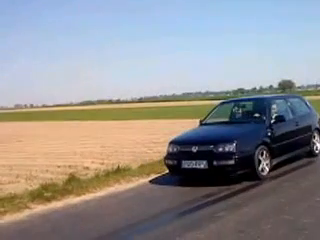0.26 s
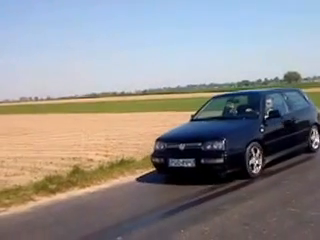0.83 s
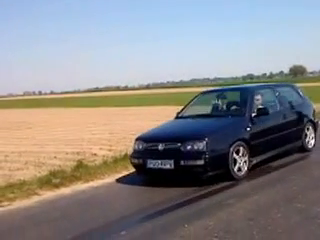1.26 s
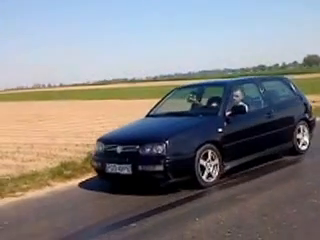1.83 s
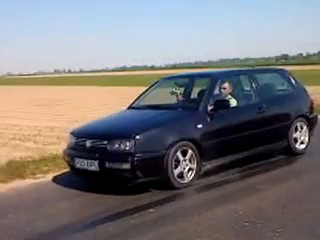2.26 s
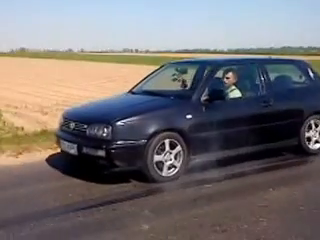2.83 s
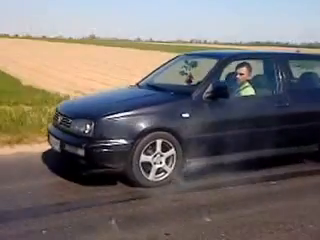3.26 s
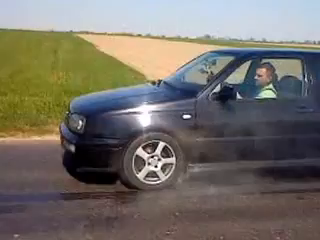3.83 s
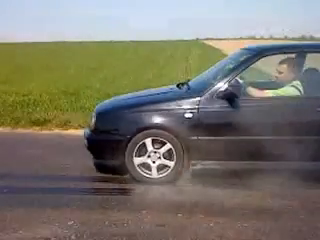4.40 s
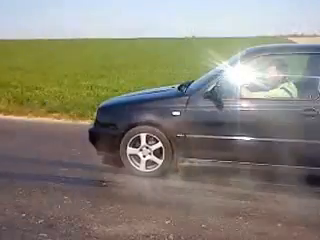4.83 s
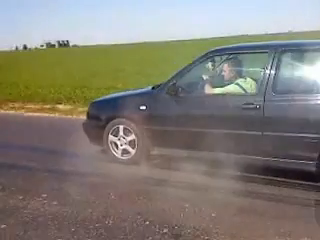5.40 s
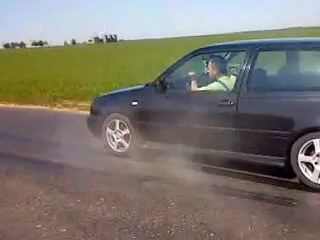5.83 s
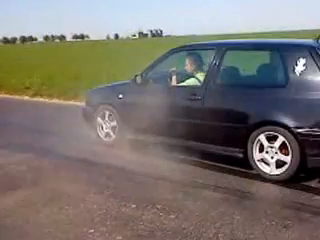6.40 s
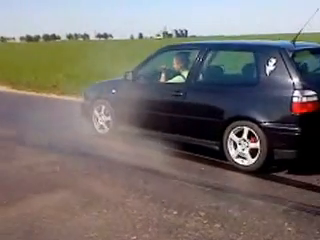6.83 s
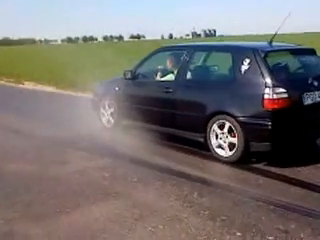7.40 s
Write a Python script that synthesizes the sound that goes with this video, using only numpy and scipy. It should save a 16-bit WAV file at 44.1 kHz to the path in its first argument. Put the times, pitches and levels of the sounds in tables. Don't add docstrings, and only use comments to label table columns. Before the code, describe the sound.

Small car at an open roadside: brief grating squeal, engine revs surge and hold in a steady buzzing roar with tyre scrub and wind buffets.

```python
import sys
import numpy as np
from scipy import signal
from scipy.fft import rfft, irfft, next_fast_len
from scipy.io import wavfile
from scipy.ndimage import uniform_filter1d, map_coordinates

SR = 44100
rng = np.random.default_rng(int(sys.argv[2]) if len(sys.argv) > 2 else 0)


def wav_out(sig):
    wavfile.write(sys.argv[1], SR, np.round(np.clip(np.atleast_2d(sig).T, -1, 1) * 32767).astype(np.int16))


def to_linear_factor(level_db):
    exponent = np.asarray(level_db, float) / 20
    return 10 ** exponent


N = 332955
T = np.arange(N) / SR


def unit(x):
    return x / np.sqrt(np.mean(x ** 2))


def columns(table):
    s, *rest = np.transpose(table)
    return [np.interp(T, s, column) for column in rest]


def colour(x, points):
    hz, db = np.transpose(points)
    size = next_fast_len(N, True)
    f = np.maximum(np.arange(size // 2 + 1) * SR / size, 1)
    gain = to_linear_factor(np.interp(np.log(f), np.log(hz), db))
    return irfft(rfft(x, size) * gain, size)[:N]


def walk(rate, size=N):
    hold = int(SR / rate)
    steps = np.repeat(rng.standard_normal(size // hold + 2), hold)
    slewed = uniform_filter1d(uniform_filter1d(steps, hold), hold)
    return unit(slewed[:size])


def swell(s, half, db):
    return to_linear_factor(db) * np.exp(-((T - s) / half) ** 2)


# time in seconds, firing rate in Hz, level of the firing tone in dB.
ENGINE = [(0, 74.9, -38), (.17, 69.5, -26), (.26, 66.3, -40), (.65, 67, -40), (.9, 71.2, -33),
          (1.1, 81, -35), (1.4, 98.8, -38), (1.5, 106.5, -25), (1.8, 124.5, -19.5), (2.1, 137.6, -18.5),
          (2.4, 147.9, -16), (2.75, 150.8, -15), (3.15, 151.1, -16.5), (3.65, 149.6, -17.5),
          (4.4, 150.3, -15), (5.6, 151.2, -19), (6.5, 151.2, -16), (7.55, 153.3, -16.5)]


def crankshaft():
    firing_hz, firing_db = columns(ENGINE)
    hz = uniform_filter1d(firing_hz, SR // 8) / 4
    return np.cumsum(hz) / SR, hz, firing_db


def tone(cycles, order, wobble):
    size = len(cycles)
    phase = 2 * np.pi * order * cycles + wobble * walk(12, size=size) + rng.uniform(0, 6.96)
    return np.sqrt(2) * to_linear_factor(wobble * 5.9 * walk(8.1, size=size)) * np.sin(phase)


PIPE_ORDERS = (8, 12, 7, 6, 14)
PIPE_UNDER_DB = (-24, -21.5, -15, -27.5, -31.5)
# order in waves per cycle, centre in seconds, half length in seconds, peak in dB.
PIPE_SWELLS = [(8, 0.06, 0.11, -31.5), (8, 1.24, 0.15, -25), (8, 1.824, .17, -21.5), (8, 2.26, 0.2, -27.5),
               (8, 3.8, .5, -31), (8, 5.75, 0.73, -23), (8, 7.5, .6, -35.5), (12, .08, .1, -34),
               (12, 1.09, 0.086, -27.5), (12, 1.36, .1, -24), (12, 2.09, 0.2, -25.5), (12, 3.4, .6, -31.5),
               (12, 4.4, .17, -31), (12, 5.5, 0.85, -27), (12, 7.5, 0.39, -36.5), (7, 1.2, .08, -37),
               (7, 1.5, .15, -42), (7, 2.08, 0.13, -30), (7, 4.4, .5, -31), (7, 6.7, 0.45, -32),
               (7, 5.4, 0.38, -37), (7, 3.4, .4, -34), (6, 4.6, 1.2, -45), (6, 1.42, 0.089, -32),
               (14, 1.285, 0.098, -33), (14, 2.3, 0.42, -43.5)]
# order in waves per cycle, centre in seconds, half length in seconds, peak in dB.
WHINES = [(20, 1.08, 0.14, -32.5), (18, 1.18, 0.053, -27.5), (28, 1.55, 0.27, -31), (23, 2.5, 0.32, -30.5),
          (18, 1.8, 0.21, -42), (11, 1.26, .047, -26), (10, 1.6, 0.065, -30), (9, 1.49, 0.17, -25.5),
          (10, 3.9, .27, -32), (20, 2.81, 0.53, -27.5), (32, 3.12, 0.36, -30), (48, 1.95, 0.18, -32.5),
          (24, 3.2, 0.55, -28.5), (28, 3.7, .8, -25), (56, 3.6, 0.88, -32.5), (44, 3.67, .41, -30.5),
          (18, 4.7, 1.1, -33), (20, 4.8, 1.1, -31), (32, 5.8, .8, -29.5), (24, 5.8, 1.1, -33),
          (43, 5.5, 0.73, -26.5), (46, 6.3, 1.1, -34), (60, 6.6, 0.22, -30.5), (39, 6.9, .43, -34.5),
          (43, 7.2, 1, -34), (20, 7.2, 0.36, -27.5), (28, 7.0, .5, -30.5), (10, 2.9, .45, -30),
          (10, 6.6, 1.3, -34), (5, 3.9, 1.6, -37)]


def exhaust(cycles, firing_db):
    out = to_linear_factor(firing_db) * tone(cycles, order=4, wobble=0.057)
    for pipe_order, under_db in zip(PIPE_ORDERS, PIPE_UNDER_DB):
        size = to_linear_factor(firing_db + under_db)
        size += sum(swell(*row) for order, *row in PIPE_SWELLS if round(order) == pipe_order)
        out += size * tone(cycles, pipe_order, wobble=0.045 * np.sqrt(pipe_order))
    for order, s, half, db in WHINES:
        near = np.abs(T - s) < 2.2 * half
        out[near] += swell(s, half, db)[near] * tone(cycles[near], round(order), wobble=0.24)
    return out


def clatter(cycles, hz, drift):
    size = 768
    orders = rfft(rng.standard_normal((40, size)))
    patterns = irfft(orders / np.abs(orders) ** 0.2, size)
    reshuffle = 9 * np.cumsum(np.abs(np.gradient(np.log(hz))))
    row = np.clip(drift * T + reshuffle, 0, 38.9)
    blend = row % 1
    played = map_coordinates(patterns, [row, cycles % 1 * size], order=1, mode="grid-wrap")
    return unit(played * np.sqrt(hz / ((1 - blend) ** 2 + blend ** 2)))


# centre in seconds, half length in seconds, frequency in Hz, gain in dB.
FACING = [(6.1, .5, 1650, 4), (1.17, .95, 3980, 9), (1.35, .6, 246, 8), (1.1, .9, 2104, -7),
          (1.37, .7, 2500, 4.5), (1.2, 1, 4550, -1.5), (1.702, .76, 6150, -1.5), (2.004, 1, 5280, 6.5),
          (2.36, 0.77, 3160, -4), (2.89, 0.55, 1760, 5.5), (3.05, .65, 3600, -5), (1.8, 0.36, 1700, 4),
          (3.6, 0.55, 1323, 8.5), (3.9, .39, 810, -4), (4.3, 1, 1530, -7.5), (3.9, 0.42, 3030, 2.5),
          (4.4, 0.31, 2400, -7.5), (7.2, .3, 1900, 5), (6.9, 0.41, 3080, 5), (1.74, 0.68, 575, 8),
          (.5, .48, 747, 7), (2.52, 0.76, 1230, 7), (.13, 0.08, 2590, 11.5), (5.3, .79, 6400, -4),
          (6.7, 0.25, 2340, 8.5), (6.8, 0.39, 2010, -5), (6.9, .6, 2850, -5.5), (7.2, 0.76, 1600, 5),
          (7.3, 0.3, 4020, -6), (7.3, 0.87, 5220, 5)]


def facing(x):
    f, s, frames = signal.stft(x, SR, nperseg=2048)
    db = 0
    for centre, half, hz, peak_db in FACING:
        half_width_hz = 18 + 0.051 * hz
        over_hz = np.exp(-((f - hz) / half_width_hz) ** 2)
        over_time = np.exp(-((s - centre) / half) ** 2)
        db = db + peak_db * np.outer(over_hz, over_time)
    return signal.istft(frames * to_linear_factor(db), SR, nperseg=2048)[1][:N]


# time in seconds, roar in dB as heard, brightness of the slipping hiss on it in dB.
ROAR = [(0, -6, -2), (.19, -7, -2.5), (.22, -5.5, 13), (.26, -16, 13.5), (.5, -15, 9.5), (.75, -11.5, 7),
        (.95, -9, 3), (1.05, -4.5, 3), (1.2, -1, 1), (1.6, 2.5, -2.7), (2.5, -0.4, 0), (3.4, -0.5, 1.8),
        (4.3, 1.5, -1.1), (5.0, -1, 0.1), (5.8, 0.4, 1.5), (6.4, -2, 0), (7.0, -1.7, -0.8), (7.55, -1, 0)]
# frequency in Hz, level in dB per Hz.
BODY = [(40, -26.5), (110, -5.5), (200, -4.5), (330, 1.5), (470, -3.5), (590, -9), (720, 1.5), (1080, 1.5),
        (1300, -6), (1430, -5.5), (1620, -5.5), (3100, -6), (3650, -7.5), (6500, -10)]


def roar(cycles, hz):
    roar_db, bright_db = columns(ROAR)
    sump_db = -5.5 - 0.16 * roar_db - 1.03 * bright_db
    knock_db = 0.082 + 0.85 * roar_db + 0.28 * bright_db
    firing = 1 + 0.057 * np.cos(2 * np.pi * 4 * cycles)
    scrub = unit(rng.standard_normal(N) * firing * to_linear_factor(0.51 * walk(15)))
    scrub = colour(scrub, [(40, 6), (110, 0), (300, -5), (800, 0)])
    knocks = colour(clatter(cycles, hz, drift=1.6), [(2600, 0), (5500, -8)])
    share = np.clip(0.22 + 0.02 * T, 0, 1)
    body = colour(np.sqrt(share) * knocks + np.sqrt(1 - share) * scrub, BODY)
    sump = colour(body, [(520, -18.5), (680, -39)])
    block = colour(body, [(520, -32.5), (640, -7.5), (1380, 0.5), (1500, -35.5)])
    knock = colour(body, [(1380, -38.5), (1480, 3.0), (3300, -2), (3800, -24.5)])
    hiss = colour(body, [(3200, -35.5), (3600, 5.0)])
    # region, level in dB, its own sway in dB
    parts = ((sump, sump_db, 0.6), (block, roar_db - 0.78, 0.6),
             (knock, knock_db, 0.7), (hiss, roar_db + bright_db - 4, 0.7))
    held_db = -22
    together = walk(8)
    out = np.zeros(N)
    for x, db, own_db in parts:
        out += unit(x) * to_linear_factor(held_db + db + own_db * walk(7) + 0.4 * together)
    return facing(out)


# frequency in Hz, level in dB per Hz.
WIND_COLOUR = [(6, -47), (18, -21), (35, -8.5), (70, -4), (120, -9), (250, -11), (500, -42)]
# time in seconds, level in dB.
BREEZE = [(0, -41), (1.6, -37), (2.8, -55.5), (4.8, -58.5), (5.9, -48), (6.4, -44), (7.55, -52)]
# centre in seconds, half length in seconds, peak in dB.
GUSTS = [(0.164, 0.054, -27.5), (0.756, .06, -32.5), (.86, .05, -29), (1.198, 0.03, -25.5),
         (1.41, 0.11, -32), (1.85, 0.12, -39), (2.09, .04, -32), (2.29, 0.028, -33), (2.465, .04, -40),
         (2.63, .06, -37), (3.13, .1, -49), (3.324, .08, -44), (3.68, .1, -43), (4.15, 0.17, -48),
         (5.05, .03, -44), (5.218, 0.042, -47), (5.48, .08, -46), (5.648, .07, -42), (6.17, .05, -33),
         (6.33, .03, -34), (6.548, .1, -37), (6.75, .03, -31), (6.912, .04, -25), (7.08, .08, -38),
         (7.28, .03, -41), (7.51, 0.028, -41)]


def wind():
    lumps = rng.standard_normal(N) * to_linear_factor(2.2 * walk(25))
    size = to_linear_factor(columns(BREEZE)[0] + 3.3 * walk(9)) + sum(swell(*gust) for gust in GUSTS)
    return unit(colour(lumps, WIND_COLOUR)) * size * to_linear_factor(4.0)


# centre in seconds, peak in dB, pitch in Hz, half length in seconds, upper mode in dB.
SQUEAL = [(0.118, -44, 2120, .0065, -20), (0.213, -19, 1800, .004, -29), (.229, -9, 1680, 0.0063, -19),
          (0.239, -7.5, 1620, 0.0063, -15.5), (0.252, -4, 1610, 0.0038, -9), (0.26, -7, 1610, 0.0039, -15),
          (0.273, -8.5, 1632, 0.011, -22), (0.3, -11.5, 1685, 0.0071, -13), (0.314, -13, 1690, 0.0032, -24),
          (0.326, -15, 1734, 0.0032, -21), (0.339, -13.5, 1754, 0.005, -23), (.352, -20, 1735, .004, -28),
          (0.368, -18, 1750, 0.0076, -38), (0.386, -15, 1648, 0.0076, -22), (0.406, -20, 1658, 0.0037, -38),
          (.449, -14.5, 1740, 0.0083, -22.5), (.467, -19, 1770, .0028, -27),
          (0.504, -23, 2124, 0.0089, -17), (0.518, -19.5, 2170, 0.0031, -27),
          (0.639, -17, 2100, .0035, -12), (.644, -20, 2130, .005, -16), (0.55, -36, 2120, 0.0043, -27)]


def squeal():
    s, db, hz, half, upper_db = np.transpose(SQUEAL)
    upper_hz = 563 + 1.63 * hz
    shape = np.exp(-((T[:SR] - s[:, None]) / (1.35 * half[:, None])) ** 2)
    loudest = np.argmax(shape * to_linear_factor(db)[:, None], axis=0)

    def phase(burst_hz, shake):
        held = uniform_filter1d(burst_hz[loudest], 200) * (1 + shake * walk(400)[:SR])
        return 2 * np.pi * np.cumsum(held) / SR

    low, high = phase(hz, 0.018), phase(upper_hz, 0.022)
    size = np.max(to_linear_factor(db)[:, None] * shape, axis=0)
    upper = np.max(to_linear_factor(upper_db)[:, None] * shape, axis=0) * to_linear_factor(3.5 * walk(130)[:SR] - 6)
    side = to_linear_factor(-18 + 5 * walk(200)[:SR]) * np.sin(1.26 * low)
    overtone = to_linear_factor(-31) * np.sin(3 * low)
    return np.pad(size * (np.sin(low) + side + overtone) + upper * np.sin(high), (0, N - SR))


def scene():
    cycles, hz, firing_db = crankshaft()
    return (exhaust(cycles, firing_db) + roar(cycles, hz) + wind() + squeal())[None]


# frequency in Hz, band against its usual level in dB, single line against its band in dB.
TREBLE_BARS = [(2800, -16, -20), (3700, -8, -12), (4500, -7, -10), (5200, -10, -9), (6000, -5.5, -5),
               (6450, -2.2, -2), (7000, -2.5, -1), (7340, 4.5, 0)]


def treble_dropouts(x):
    top_hz, lines = 7290, 11
    f, s, frames = signal.stft(x, SR, nperseg=5632)
    band = np.arange(len(f)) // lines
    line_power = np.abs(frames) ** 2
    power = np.add.reduceat(line_power, np.arange(0, len(f), lines)) / lines
    usual = uniform_filter1d(uniform_filter1d(power, size=9, axis=1), size=3, axis=0)
    lasting = unit(uniform_filter1d(rng.standard_normal(power.shape), size=4, axis=1))
    shift_db = 1.2 * rng.standard_normal(len(s)) + 3.8 * lasting
    hz, *bars_db = np.transpose(TREBLE_BARS)
    band_db, line_db = (np.interp(f, hz, db, left=-99)[:, None] for db in bars_db)
    kept = power[band] > usual[band] * to_linear_factor(band_db + shift_db[band]) ** 2
    kept &= f[:, None] < top_hz
    kept &= line_power > power[band] * to_linear_factor(line_db) ** 2
    return signal.istft(frames * kept, SR, nperseg=5632)[1][:N]


def top_cut(x):
    return signal.sosfilt(signal.butter(12, 7940, fs=SR, output="sos"), x)


def record(dry):
    soft = np.tanh(0.8 * dry[0]) / 0.8
    dull = colour(soft, [(6000, 0), (6700, -1.5), (7100, -10.5), (7340, -20)])
    mix = treble_dropouts(dull)[None]
    return top_cut(mix)


dry = scene()
out = record(dry)
wav_out(out)
```